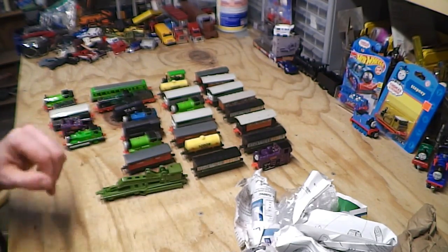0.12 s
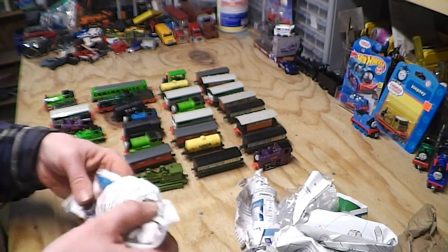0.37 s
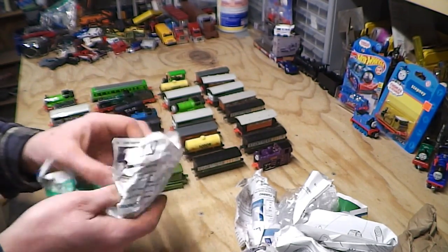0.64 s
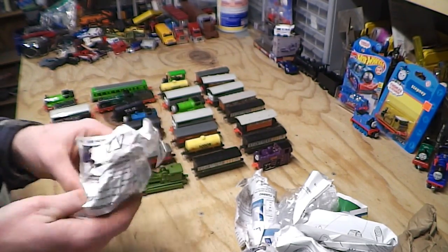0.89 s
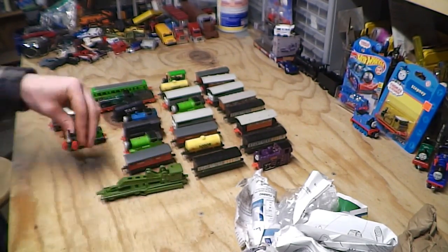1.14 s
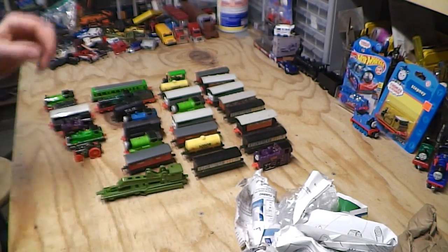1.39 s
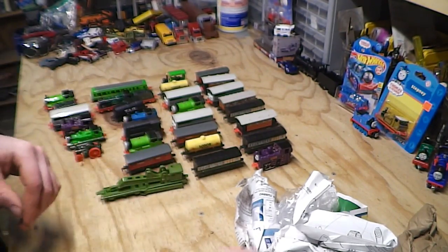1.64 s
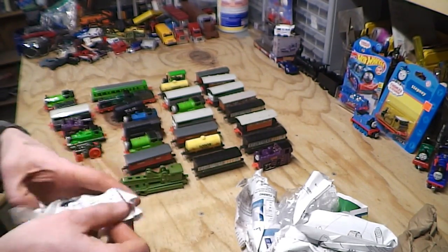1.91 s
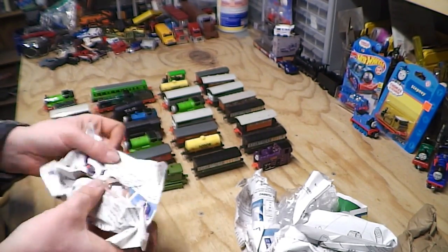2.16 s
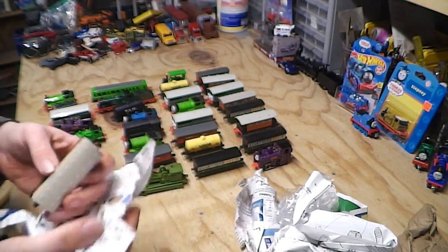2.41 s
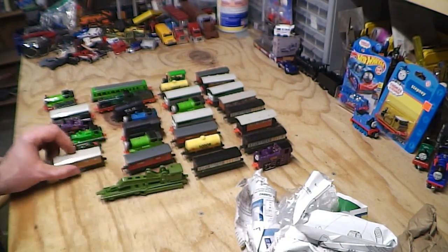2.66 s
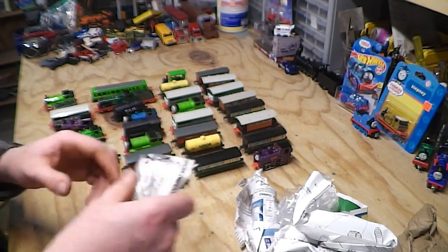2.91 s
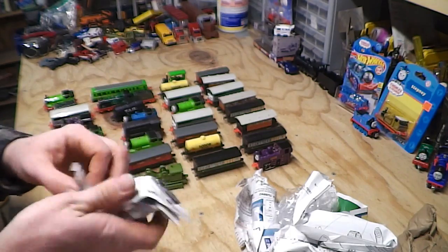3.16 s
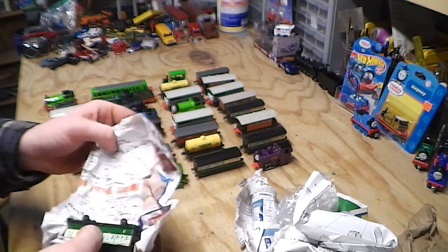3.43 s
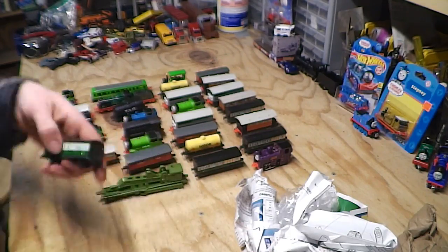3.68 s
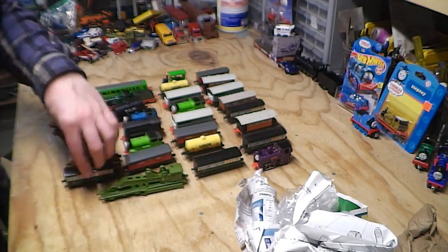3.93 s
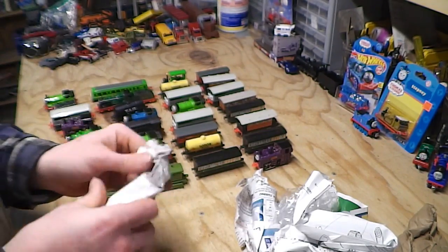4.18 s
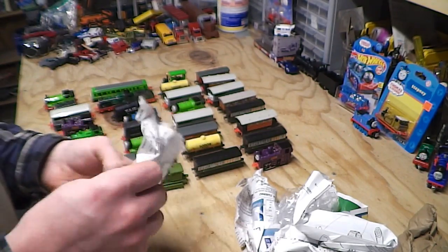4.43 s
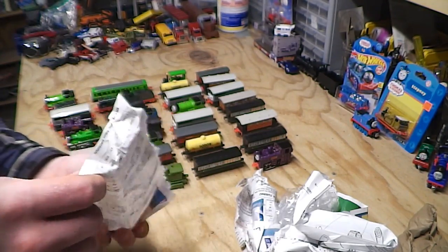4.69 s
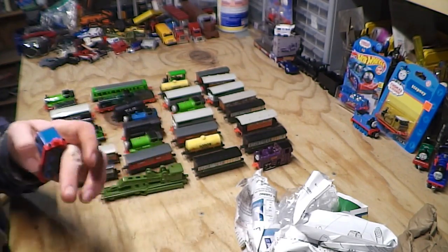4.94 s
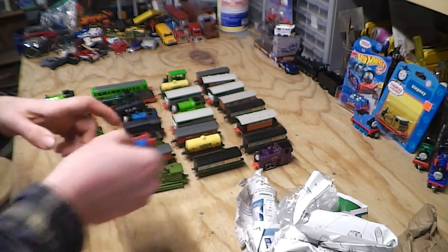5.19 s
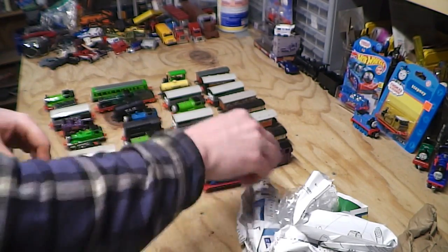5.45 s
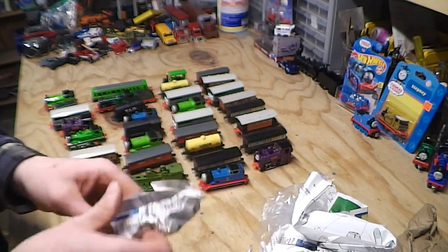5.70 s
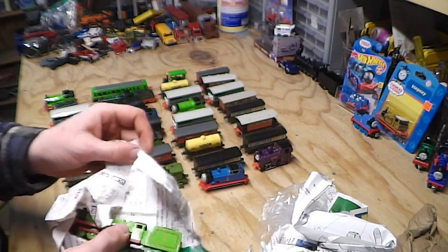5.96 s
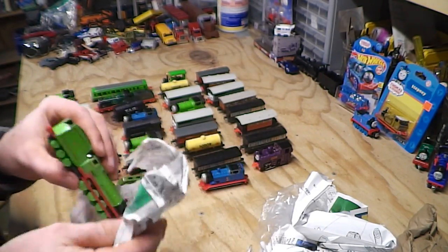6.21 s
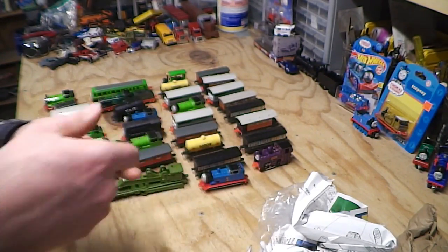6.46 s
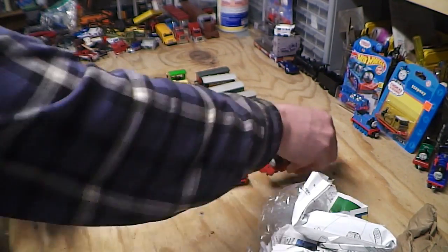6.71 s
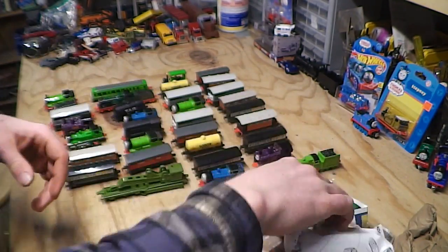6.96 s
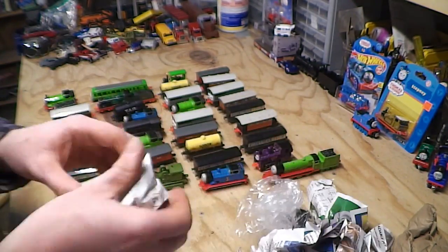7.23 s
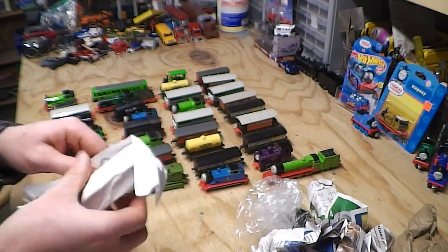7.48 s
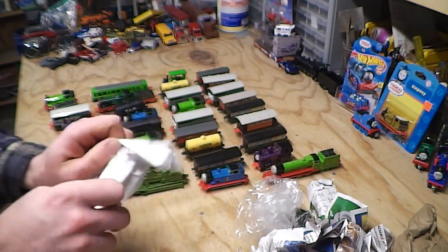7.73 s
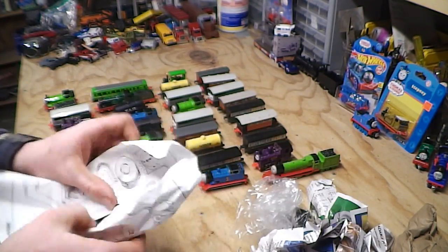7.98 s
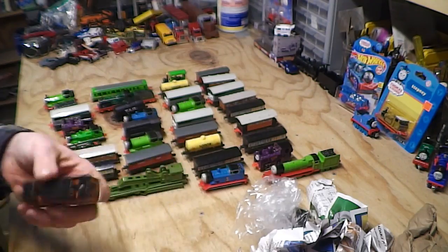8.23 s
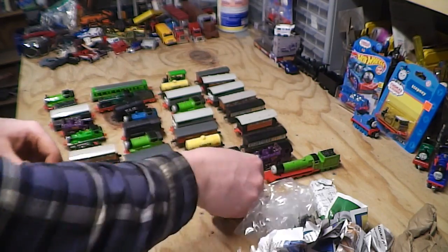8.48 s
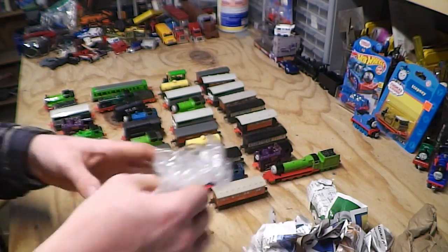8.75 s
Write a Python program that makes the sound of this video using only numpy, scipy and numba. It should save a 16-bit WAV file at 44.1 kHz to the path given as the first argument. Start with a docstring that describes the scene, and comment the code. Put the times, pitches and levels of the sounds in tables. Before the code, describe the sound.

Hands pull crisp packing paper off small toy trains at sped-up pace. Dense crackles, sharp crease snaps and sliding rustle come in irregular bursts with short gaps between them. Toys knock lightly on a wooden bench with a tiny wheel rattle, hardest a little after four seconds. The paper gets loudest and fuller near eight seconds. Close stereo microphone, small dry workshop, dull hiss and low hum behind.

```python
"""Packing paper unwrapped from small toys, played fast, close up over a wooden bench in a quiet workshop.
Creases snap and ring patches of the sheet, small folds crackle densely as damped rings, and sliding fingers
rustle as shaped noise. Toys knock damped modes of the bench, with a dying rattle of wheels.
Behind lie a dull hiss of filtered noise, a low hum and thin appliance tones: sines whose phases hop at the
splices of sped-up playback."""
import sys
import numpy as np
from scipy import signal
from scipy.fft import rfft, irfft
from scipy.io import wavfile
from scipy.ndimage import uniform_filter1d
from numba import njit

SR = 44100
rng = np.random.default_rng(int(sys.argv[2]) if len(sys.argv) > 2 else 0)


def gain_from_db(level_db):
    """Turn a decibel level (scalar or array-like) into a linear amplitude factor."""
    decades = np.asarray(level_db, float) / 20
    return 10 ** decades


def wrap_up_sound(samples):
    """Save the sound to the file named by the first command line argument, as 16-bit audio."""
    columns = np.atleast_2d(samples).T
    # keep every value between -1 and 1, then stretch to whole-number steps
    tamed = np.clip(columns, -1, 1)
    steps = np.round(tamed * 32767).astype(np.int16)
    wavfile.write(sys.argv[1], SR, steps)


N = 391166  # length in samples
SPLIT_HZ = 2300  # the sheet's body sounds below, its crispness above


def colour(x, points):
    """Minimum-phase filtering: the folded cepstrum turns (Hz, dB) points into a causal response."""
    hz, db = np.transpose(points)
    log_hz = np.log(np.linspace(1, SR / 2, 1025))
    log_gain = np.interp(log_hz, np.log(hz), db) * np.log(10) / 20
    cepstrum = irfft(log_gain)
    cepstrum[1:1024] *= 2
    cepstrum[1025:] = 0
    response = irfft(np.exp(rfft(cepstrum)))
    return signal.fftconvolve(x, response[None], axes=1)[:, :N]


def unit(x):
    """Normalisation of power: scale to rms 1."""
    return x / np.sqrt(np.mean(x ** 2))


def walk(rate):
    """Band-limited fluctuation: random levels held 1 / rate s and smoothed twice, with rms 1."""
    hold = int(SR / rate)
    steps = np.repeat(rng.standard_normal(N // hold + 1), hold)
    smooth = uniform_filter1d(uniform_filter1d(steps, hold), hold)
    return unit(smooth[:N])


# Gain of the part opposed between left and right. Each row: frequency in Hz, gain in dB before extra_db.
OPPOSED_GAIN = [(300, -13), (16000, -2)]


def wide(extra_db):
    """Interchannel coherence: a common noise plus an opposed one that grows toward the treble."""
    common, opposed = rng.standard_normal((2, 1, N))
    return common + gain_from_db(extra_db) * colour(opposed, OPPOSED_GAIN) * np.array([[1], [-1]])


# Spectrum of the room hiss. Each row: frequency in Hz, relative density in dB per Hz.
ROOM_SPECTRUM = [(130, -13.5), (280, -13.5), (415, -8.5), (595, -14), (1650, -13.5), (2750, -34),
                 (4570, -28), (16000, -53)]
# Low hum and appliance tones.
# Each row: frequency in Hz, nominal level in dB rms, left-right likeness from 0 to 1.
STEADY_TONES = [(56.4, -63, 0.9), (432, -69.5, 0.88), (12414, -83, 0.4)]


def workshop():
    """Stationary background: coloured noise, and sines whose phases hop at the splices of sped-up playback."""
    hiss_db, splice_s = -60.5, 0.036
    out = gain_from_db(hiss_db + 0.24 * walk(4.4)) * unit(colour(wide(extra_db=12.0), ROOM_SPECTRUM))
    hold = int(splice_s * SR)
    for hz, db, alike in STEADY_TONES:
        phase = 2 * np.pi * rng.random((2, N // hold + 1))
        phase[1] = phase[0] + (1 - alike) * (phase[1] - np.pi)
        phasor = np.repeat(np.exp(1j * phase), hold, axis=1)[:, :N]
        # each splice cross-fades over half the time between splices
        phasor = uniform_filter1d(phasor.real, hold // 2) + 1j * uniform_filter1d(phasor.imag, hold // 2)
        carrier = np.exp(2j * np.pi * hz * np.arange(N) / SR)
        out = out + gain_from_db(db) * np.sqrt(2) * (phasor * carrier).real
    return out


# Every grab, pull or squeeze of the paper. Each row: peak time in seconds, rise in seconds,
# fall in seconds, relative rustle level in dB, relative brightness in dB.
HAND_GRIPS = [(.21, 0.037, 1, -44.5, 3), (.75, 0.71, 0.12, -40.5, 5), (.98, 0.15, 0.12, -41, 2.5),
              (1.1, .3, 0.33, -57.5, -13), (1.309, 0.039, 0.025, -44, -8.5), (1.558, 0.037, 0.12, -35, -4),
              (2.4, 0.96, 0.39, -43.5, 6.5), (2.96, 0.064, 0.078, -54, -2), (3.08, 0.11, 0.7, -59, 16.5),
              (3.49, 0.63, 0.16, -38, 3.5), (3.74, 1, 0.28, -49, 3.5), (4.03, 0.07, 0.061, -43.5, -2),
              (4.17, 0.026, 0.089, -41, -23), (4.41, 0.16, 0.067, -38.5, 4), (4.529, 0.088, 0.15, -38.5, 3),
              (4.97, 0.83, 0.12, -46.5, -2.5), (5.419, 0.038, 0.011, -47.5, 3.5), (5.6, 0.035, 1, -44, 3),
              (5.98, 0.43, 0.47, -37, 1.5), (6.4, 0.4, 0.19, -62.5, 9.5), (6.881, 0.035, 0.026, -41.5, 2),
              (7.051, 0.051, 0.25, -38, -2.5), (7.173, 0.085, 0.1, -35.5, 0.5),
              (7.41, 0.1, 0.093, -51.5, 11.5), (7.75, 0.98, 0.068, -44.5, 0.5),
              (7.87, 0.087, 0.32, -43.5, 7), (8.07, 0.5, 0.35, -34.5, -5), (8.345, 1, 0.44, -55, 8.5),
              (8.5, .2, 0.14, -66, -9), (8.742, 0.024, 0.23, -42, -0.5)]
# Spells in which fingers touch the paper. Each row: start in seconds, end in seconds.
TOUCH_SPELLS = [(.178, 1.125), (1.27, 1.345), (1.525, 2.67), (2.765, 2.985), (3.04, 3.86), (3.97, 4.1),
                (4.145, 5.015), (5.08, 5.46), (5.575, 6.455), (6.85, 6.905), (7.012, 8.372), (8.42, 8.675),
                (8.722, 8.85)]


def hands():
    """Addition of powers: grips swell and fade while the paper is held, over the resting heap; level, brightness."""
    swell_db = 20  # a grip climbs this much in its rise time and drops as much in its fall time
    rest_db, rest_bright_db = -67, -4  # the heap of sheets settling between grips
    touch_s = .012  # time to take hold or let go
    t = np.arange(0, N, 64) / SR
    peak_s, rise, fall, db, bright = np.array(HAND_GRIPS).T[..., None]
    before, after = (peak_s - t) / np.maximum(rise, .005), (t - peak_s) / np.maximum(fall, .005)
    db = db - swell_db * np.maximum(before, after)
    spells = [np.clip(np.minimum(t - start, end - t) / touch_s + .5, 0, 1) for start, end in TOUCH_SPELLS]
    held = np.max(spells, axis=0) ** 2
    body_power = held * np.sum(gain_from_db(db) ** 2, axis=0) + gain_from_db(rest_db) ** 2
    crisp_power = held * np.sum(gain_from_db(db + bright) ** 2, axis=0) + gain_from_db(rest_db + rest_bright_db) ** 2
    body_db, crisp_db = 10 * np.log10(body_power), 10 * np.log10(crisp_power)
    samples_s = np.arange(N) / SR
    return np.interp(samples_s, t, body_db), np.interp(samples_s, t, crisp_db - body_db)


def halves(x):
    """Band splitting: body and crispness of a sound, each at rms 1."""
    filters = [signal.butter(3, SPLIT_HZ, kind, fs=SR, output="sos") for kind in ("low", "high")]
    return [unit(signal.sosfilt(sos, x)) for sos in filters]


# Radiation of the sheet, for its noise and its rings. Each row: frequency in Hz, relative density in dB per Hz.
PAPER_SPECTRUM = [(100, -35.5), (328, -16.5), (461, -3), (801, -5.5), (1000, -4.5), (1720, -2), (2690, -7),
                  (4200, -3), (6700, -6), (12900, -9.5), (15600, -10), (16600, -56)]


def swish(envelope_low, envelope_high):
    """Friction noise: the sheet's colour, with body and crispness on their own envelopes."""
    body, crisp = halves(colour(wide(extra_db=0.5), PAPER_SPECTRUM))
    return body * envelope_low - crisp * envelope_high


@njit
def rings(at, hz, cycles, left, right, length):
    """Damped oscillation: each grain rings a few cycles with its own phase in each ear."""
    out = np.zeros((2, length))
    for g in range(len(at)):
        turn, z = np.exp((2j * np.pi - 1 / cycles[g]) * hz[g] / SR), 1 + 0j
        for i in range(at[g], min(at[g] + int(6 * cycles[g] * SR / hz[g]), length)):
            out[0, i] += (z * left[g]).imag
            out[1, i] += (z * right[g]).imag
            z *= turn
    return out


def creases(s, db, bright_db, ms, pan_db, count, cycles, scatter_db, apart):
    """Impulsive excitation of modes: a crease rings patches of the sheet, most at once and some late."""
    u = rng.random((len(s), count, 5))
    hz = 250 * 64 ** ((np.arange(count) + u[..., 0]) / count)  # one patch in each equal step of pitch
    at = s[:, None] + ms[:, None] / 1000 * np.log(1 - u[..., 1]) ** 2 / 2
    paper_hz, paper_db = np.transpose(PAPER_SPECTRUM)
    tone_db = np.interp(np.log(hz), np.log(paper_hz), paper_db) + 10 * np.log10(hz / 1500)
    crisp_db = (hz > SPLIT_HZ) * bright_db[:, None]
    size = gain_from_db(db[:, None] + tone_db + crisp_db + scatter_db * (2 * u[..., 2] - 2))
    # high patches reach the two ears with unlike phase
    lag = apart * np.sqrt(hz / 16000) * (2 * u[..., 3] - 1)
    left = size * gain_from_db(pan_db / 2)[:, None] * np.exp(1j * lag)
    right = size * gain_from_db(-pan_db / 2)[:, None] * np.exp(-1j * lag)
    turns = np.clip(cycles, .5, 9) * (0.71 + u[..., 4]) * (hz / 1500) ** 0.22
    first = (at * SR).astype(int)
    return rings(first.ravel(), hz.ravel(), turns.ravel(), left.ravel(), right.ravel(), N)


def small_crackle(level_db, bright_db):
    """Random point process: 300 small folds a second, mostly weak, follow the level of the hands."""
    u = rng.random((int(300 * N / SR), 3))
    at = (u[:, 0] * N).astype(int)
    small_db = level_db[at] - 0.8 + 19 * u[:, 1] ** 5
    return creases(at / SR, small_db, bright_db[at] + 1.4, np.full(len(at), .6), 8 * (u[:, 2] - .4),
                   count=6, cycles=1.47, scatter_db=4.5, apart=0.77)


# Lone ticks of the heap settling. Each row: start in seconds, relative level in dB.
SETTLING_TICKS = [(0.011, -61), (0.074, -57.5), (.123, -59), (3.795, -63), (3.817, -47.5), (5.107, -56.5),
                  (5.142, -57), (5.175, -50.5), (5.216, -54), (5.268, -60), (5.49, -55), (5.518, -54),
                  (8.575, -59)]


def settling_ticks():
    """Stress release: each lone fold rings many patches spread over several milliseconds."""
    s, db = np.transpose(SETTLING_TICKS)
    return creases(s, db, 0 * s + 4.3, 0 * s + 5.0, 0 * s, count=24, cycles=4.0, scatter_db=-0.5, apart=1)


# Toys and hands meeting the bench. Each row: nominal time in seconds, nominal peak level in dB.
BENCH_KNOCKS = [(0.013, -46), (.08, -40), (0.44, -38), (1.366, -33), (1.391, -34.5), (1.652, -32.5),
                (2.772, -26), (2.791, -26.5), (2.939, -35), (3.976, -39), (3.989, -32.5), (4.022, -34),
                (4.144, -36.5), (4.164, -18), (4.184, -24.5), (6.885, -40), (7.523, -30), (7.631, -34),
                (7.954, -29), (8.132, -27), (8.327, -31), (8.616, -31.5)]
# Modes of the bench top. Each row: mean frequency in Hz, mean relative level in dB, 60 dB decay in seconds.
BENCH_MODES = [(125, -15, 0.06), (235, -3.5, 0.073), (310.5, 7.5, 0.056), (414, 7, 0.053), (528, 8, 0.036),
               (762, 5.5, 0.042), (1030, -3.5, 0.038)]


def bench():
    """Modal synthesis: a short push and a dying rattle of wheels drive modes that vary from knock to knock."""
    out, t = np.zeros((2, N)), np.arange(SR // 5) / SR
    draws = rng.standard_normal((len(BENCH_KNOCKS), len(BENCH_MODES), 2))
    push = np.hanning(int(0.00029 * SR))
    for (s, db), u in zip(BENCH_KNOCKS, draws):
        ring = np.zeros(len(t))
        for (hz, gain_db, t60), (level_draw, pitch_draw) in zip(BENCH_MODES, u):
            tone = np.sin(2 * np.pi * hz * (1 + 0.082 * pitch_draw) * t)
            ring += gain_from_db(gain_db + 3.6 * level_draw) * tone * 1000. ** (-t / t60)
        rattle = np.exp(-t / 0.051) * rng.standard_normal(len(t)) * (rng.random(len(t)) < .008)
        rattle[0] = 5.5  # the first contact
        hit = signal.fftconvolve(np.convolve(ring, push), rattle)
        hit = gain_from_db(db) * hit / np.abs(hit).max()
        i = int((s + 0.0019) * SR)
        out[:, i:i + len(hit)] += gain_from_db(u[:2, :1]) * hit[:N - i]  # each ear's level strays a little
    return signal.sosfilt(signal.butter(2, 105., "high", fs=SR, output="sos"), out)


# Creases that snap and the rush of folds with them. Each row: nominal time in seconds,
# relative body level in dB, relative brightness in dB, nominal length in ms.
CREASE_SNAPS = [(0.197, -37, 3, 14), (.219, -35, 1.5, 4), (.241, -38, -3, 9), (0.276, -33, 1.5, 12),
                (.368, -36.5, 0, 5.4), (0.445, -33, -5, 19), (.478, -38, 3.5, 18), (.509, -34, -1.5, 12),
                (0.547, -39, 9, 9.3), (0.659, -38.5, 5.5, 29), (0.713, -29.5, -1.5, 9.4),
                (0.736, -36, -7, 5.6), (0.761, -32.5, -1.5, 20), (.843, -41.5, 7.5, 5.1),
                (.877, -37, -1.5, 9.5), (.972, -39.5, 3.5, 5), (1.392, -45.5, -14, 7.9),
                (1.555, -32, -10, 11), (1.657, -44, 5.5, 12), (1.746, -37.5, -3.5, 13.5),
                (1.798, -38, 0.5, 22), (1.862, -48.5, 12.5, 7.1), (1.919, -48.5, 11, 31),
                (2.026, -45, 12, 33), (2.101, -38.5, 7.5, 7.8), (2.169, -39, 7.5, 16),
                (2.21, -35.5, 1.5, 30), (2.257, -31, 4, 4.6), (2.295, -37, 7.5, 4.4), (2.331, -36.5, 9, 4),
                (2.378, -33, 7, 6), (2.394, -33, 2.5, 18.5), (2.444, -36, 6.5, 13), (2.465, -34.5, 5, 7.7),
                (2.496, -39.5, 8.5, 8.2), (2.532, -42.5, 6.5, 3), (2.774, -48, 8, 19),
                (2.792, -40.5, 5, 8.2), (2.838, -59, -32.5, 3.9), (2.937, -37.5, -1.5, 9.8),
                (2.962, -47.5, 7.5, 13), (3.078, -43.5, 12.5, 8.5), (3.191, -45.5, 13.5, 23),
                (3.222, -39, 7, 10.5), (3.252, -42.5, 4.5, 8.3), (3.305, -41.5, 12.5, 12),
                (3.326, -47, 21, 4.2), (3.352, -32.5, 0.5, 25), (3.436, -29, -18, 3.8), (3.457, -37, 8, 11),
                (3.487, -34.5, 5, 16), (3.601, -42.5, 9.5, 3.6), (3.64, -38, 4.5, 13),
                (3.663, -38.5, 4.5, 7.2), (3.702, -47, 12, 33), (3.737, -39.5, 7.5, 4.4),
                (3.759, -43, 11, 13), (3.992, -52, 7, 7.1), (4.168, -32, -2, 23), (4.19, -35, 1, 3.1),
                (4.263, -44, 4, 19), (4.325, -37.5, 3.5, 19), (4.395, -38, 1, 4.8), (4.409, -31, 0.5, 5.7),
                (4.423, -30.5, -0.5, 21), (4.486, -45.5, 14, 3.4), (4.543, -27.5, -0.5, 3.3),
                (4.607, -33.5, 3.5, 27), (4.668, -39.5, 2, 9.2), (4.749, -41, 2.5, 20),
                (4.843, -40, 0.5, 7.9), (4.957, -36.5, -4, 9.3), (5.351, -45.5, -2.5, 16),
                (5.432, -43, -0.5, 7.4), (5.596, -32, -2, 11.4), (5.664, -28, -4, 11.7),
                (5.765, -51, 13.5, 5.8), (5.852, -40.5, 10.5, 6.1), (5.901, -35.5, 4.5, 15),
                (5.968, -33.5, 2, 6), (5.979, -26, -3, 8.3), (6.046, -31, -0.5, 13), (6.088, -31, -17, 6.4),
                (6.108, -31, 3, 3.1), (6.19, -36.5, 7.5, 12.4), (6.218, -41, 12.5, 9.6),
                (6.24, -35.5, 2.5, 31), (6.354, -38.5, -2.5, 11.4), (6.408, -42, 7.5, 7.7),
                (6.671, -43, 3, 18.4), (6.802, -50.5, -6, 13), (7.035, -38.5, 2.5, 20),
                (7.089, -36.5, 4, 19), (7.13, -38.5, -0.5, 14), (7.16, -35, -8, 23), (7.225, -45, 3.5, 20),
                (7.255, -45.5, -9, 14), (7.31, -55.5, -32, 25), (7.414, -37, -4, 21),
                (7.532, -28.5, -6.5, 15.6), (7.634, -30.5, -5.5, 18), (7.716, -28, -2.5, 10.4),
                (7.755, -37, 5.5, 22), (7.851, -41, 12, 25), (7.876, -36.5, 4.5, 8),
                (7.96, -24.5, -10, 7.2), (8.054, -27.5, -3, 11.5), (8.075, -26, -4.5, 13),
                (8.118, -27.5, -1.5, 16), (8.133, -25.5, -5, 13), (8.159, -30.5, -2, 14),
                (8.181, -33.5, 2.5, 11), (8.203, -33.5, 1, 6.6), (8.234, -30.5, -4, 12.4),
                (8.28, -29.5, -5, 13), (8.331, -23, -12, 10.6), (8.433, -51, 13.5, 9.2),
                (8.502, -33.5, -5, 11), (8.617, -43.5, 3.5, 8.2), (8.746, -33, -2, 11),
                (8.822, -38.5, 0.5, 12)]


def snaps():
    """Buckling: a short event is one sharp snap, so its rings are louder than those of a long one."""
    s, db, bright, ms = np.transpose(CREASE_SNAPS)
    pan_db = 0.77 + 2.0 * rng.standard_normal(len(s))
    return creases(s - .0012, db + 8.5 - 2.03 * np.sqrt(ms), bright + 1.0, np.full(len(s), .35), pan_db,
                   count=16, cycles=2.3, scatter_db=10.0, apart=0.54)


def add_rushes(low, high):
    """Energy summation: the rush of folds around each snap adds in power to both rustle envelopes."""
    s, db, bright, ms = np.transpose(CREASE_SNAPS)
    for t0, body_db, bright_db, tau in zip(s, db, bright, np.clip(ms - 2.5, 1, 60) / 1000):
        first, last = int((t0 - 2 * tau - .002) * SR), int((t0 + 3 * tau + .01) * SR)
        i = np.arange(max(first, 0), min(last, N))
        t = i / SR - t0
        rush = gain_from_db(body_db) * np.exp(-np.where(t < 0, -t / (.5 * tau), t / (0.8 * tau)) ** 1.14)
        # the buckle itself: a sudden start across all pitches, gone in a few ms
        rush += gain_from_db(body_db + 6.0 - 540 * tau) * (t > -.0008) * np.exp(-(t + 0.00078) / 0.00091)
        low[i] = np.hypot(low[i], rush)
        high[i] = np.hypot(high[i], rush * gain_from_db(bright_db - 0.75))


@njit
def resonate(x, hz, sharp):
    """Resonance: a state-variable band-pass whose centre moves every sample."""
    y = np.empty_like(x)
    for c in range(2):
        band, low = 0., 0.
        for i in range(len(hz)):
            g = np.tan(np.pi * hz[i] / SR)
            v = (band + g * (x[c, i] - low)) / (1 + g * (g + 1 / sharp))
            band, low, y[c, i] = 2 * v - band, low + 2 * g * v, v / sharp
    return y


# Air pocket between folds and palms, moving as the hands open and close.
# Each row: time in seconds, mean resonance in Hz.
AIR_POCKET = [(0, 1500), (.6, 1660), (.72, 1250), (1.5, 1060), (1.95, 1760), (2.15, 1357), (2.8, 1690),
              (3.3, 1480), (4.2, 1040), (4.27, 1770), (4.8, 1680), (4.95, 1220), (5.7, 1720), (6.2, 1050),
              (6.35, 1860), (7.05, 1440), (7.3, 1310), (7.95, 1610), (8.02, 1060), (8.7, 1500)]


def paper():
    """Source and resonator: rustle, crackle, snaps and ticks excite an air pocket and a wandering treble resonance."""
    grip_db, bright_db = hands()
    jerk_db = np.clip((grip_db + 78) / 22, .1, 1) * (1.62 * walk(40) - 1.5)  # a firm grip is jerky
    level_db = grip_db + jerk_db
    low = gain_from_db(level_db + 2.86 * walk(160))
    high = gain_from_db(level_db + bright_db + 3.84 * walk(160))
    grains = small_crackle(level_db, bright_db) + snaps() + settling_ticks()
    add_rushes(low, high)
    grit = gain_from_db(1.2 * walk(700))  # folds come unevenly
    balance = gain_from_db(np.array([[.6], [-.6]]))
    sound = swish(low * grit, high * grit) * balance + grains
    pocket_hz = np.interp(np.arange(N) / SR, *np.transpose(AIR_POCKET)) * (1 + 0.12 * walk(30))
    # a treble resonance wanders at random over the paper sound
    treble_hz = np.clip(5500 * gain_from_db(3.33 * walk(45)), 2500, 15000)
    pocket = 0.67 * resonate(sound, pocket_hz, 3.46)
    treble = 0.68 * resonate(gain_from_db(-2.5) * 0 + sound, treble_hz, 3.28)
    sound = gain_from_db(-2.5) * sound + pocket + treble
    # the paper sound is thinned below 210 Hz
    return signal.sosfilt(signal.butter(2, 210., "high", fs=SR, output="sos"), sound)


def echo(near):
    """Early reflection: bench and shelves return a dulled, short scatter that decays 60 dB in 0.16 s."""
    t = np.arange(SR // 8) / SR
    echoes = rng.standard_normal((2, len(t))) * 1000. ** (-t / 0.16) * (t > .002)
    echoes = echoes / np.sqrt(np.sum(echoes ** 2) / 2)
    dull = signal.sosfilt(signal.butter(1, 3000, fs=SR, output="sos"), near)
    return gain_from_db(-16.0) * signal.fftconvolve(dull, echoes, axes=1)[:, :N]


def scene():
    """Superposition: near sounds and their echoes over the workshop."""
    near = paper() + bench()
    return near + echo(near) + workshop()


def band_limit(x):
    """A steep low-pass at the top of the band."""
    return signal.sosfilt(signal.butter(12, 16820, fs=SR, output="sos"), x)


def record(dry):
    """Low-pass filtering: an elliptic filter dulls the very top, above 15850 Hz."""
    dull = signal.sosfilt(signal.ellip(6, .5, 32, 15850, fs=SR, output="sos"), dry)
    return band_limit(dull)


dry = scene()
out = record(dry)
wrap_up_sound(out)
```